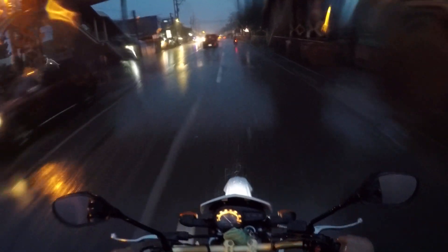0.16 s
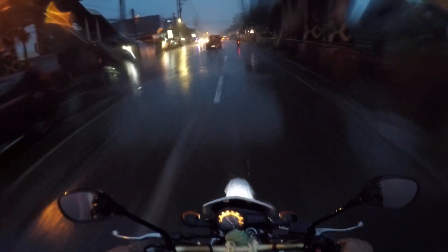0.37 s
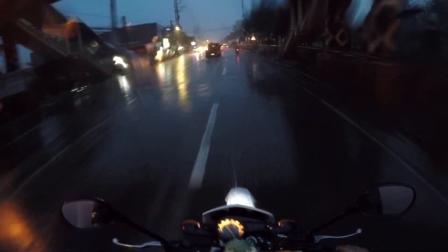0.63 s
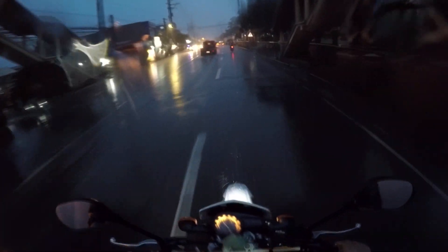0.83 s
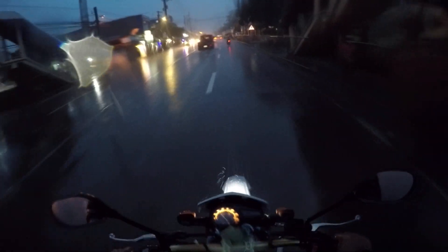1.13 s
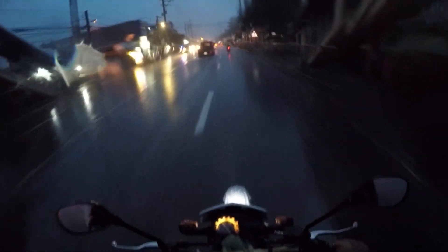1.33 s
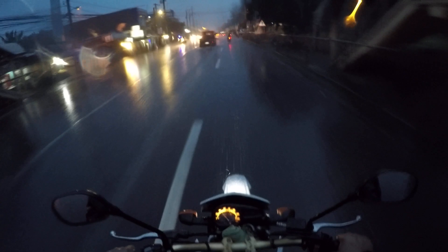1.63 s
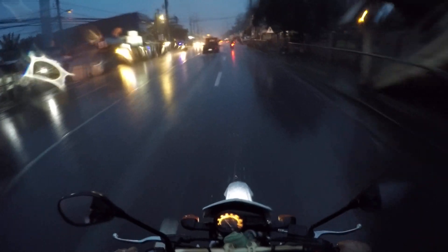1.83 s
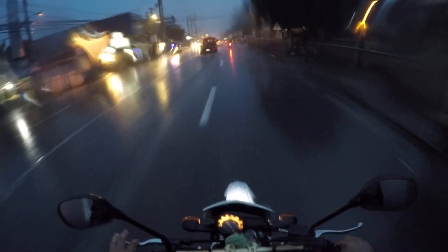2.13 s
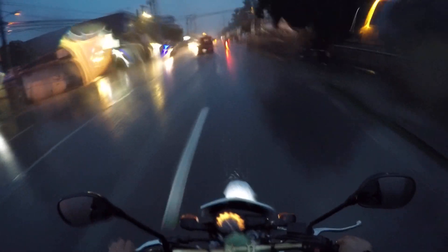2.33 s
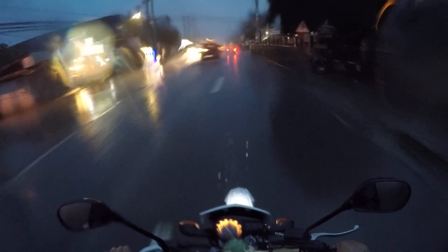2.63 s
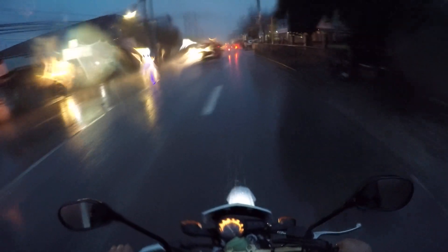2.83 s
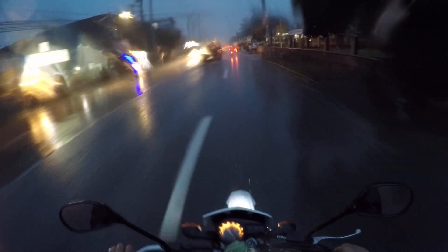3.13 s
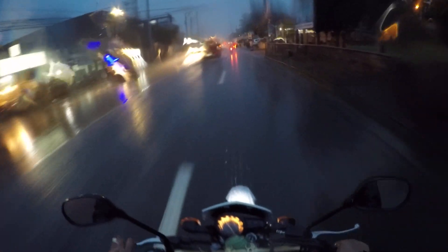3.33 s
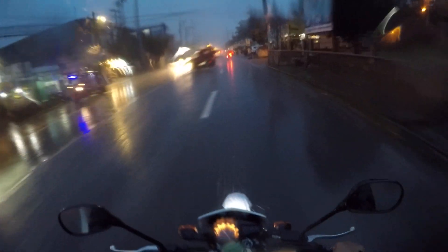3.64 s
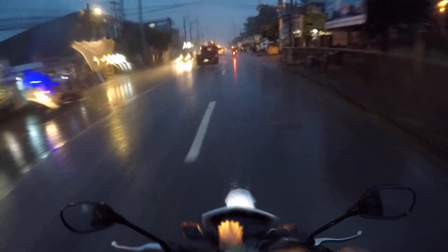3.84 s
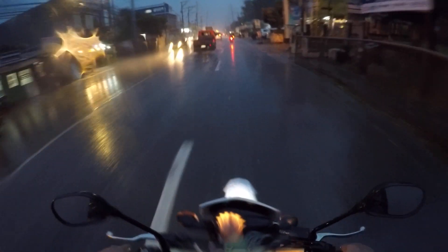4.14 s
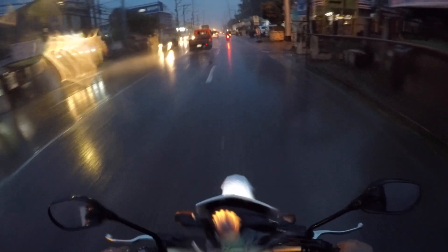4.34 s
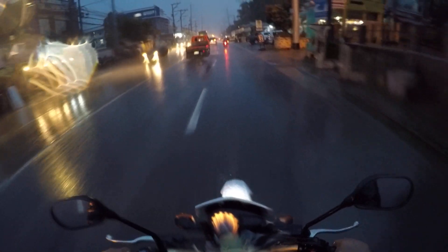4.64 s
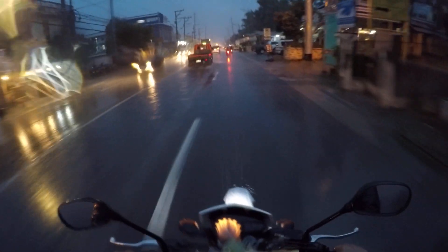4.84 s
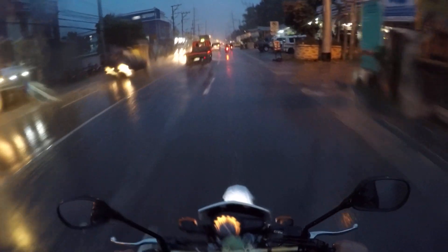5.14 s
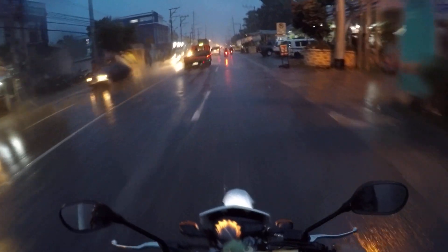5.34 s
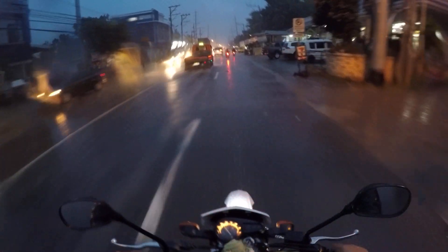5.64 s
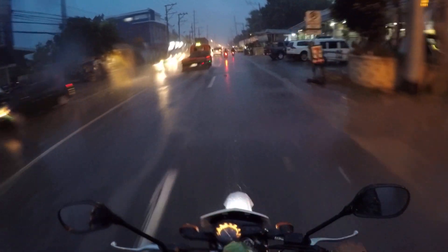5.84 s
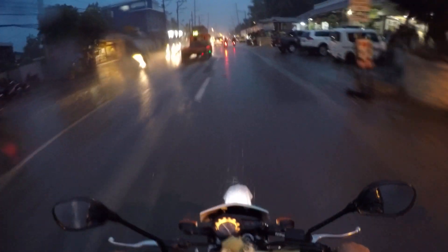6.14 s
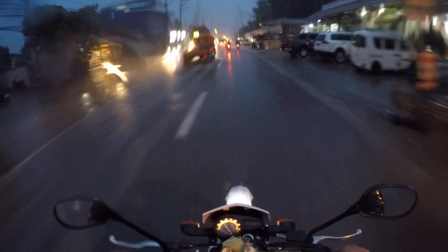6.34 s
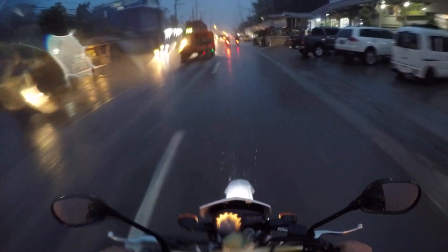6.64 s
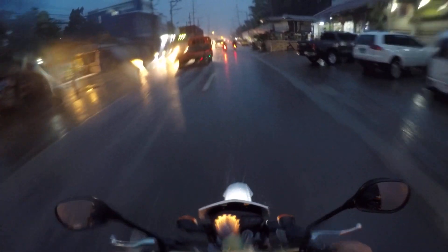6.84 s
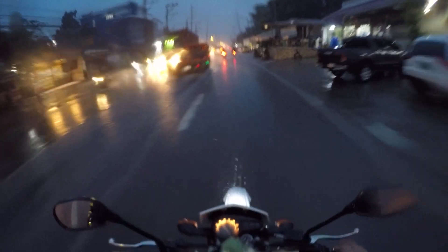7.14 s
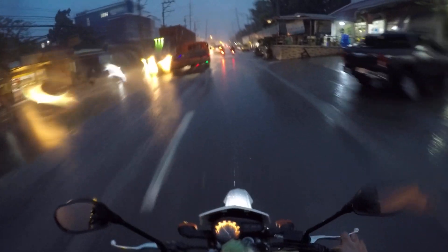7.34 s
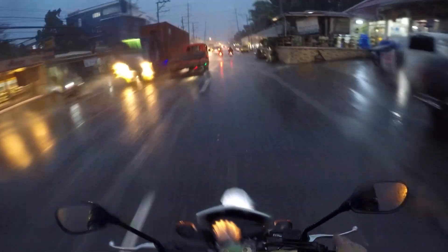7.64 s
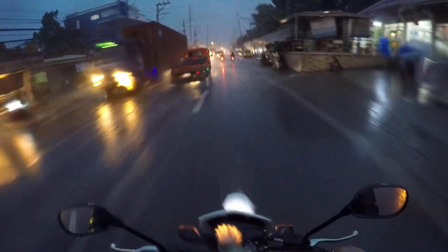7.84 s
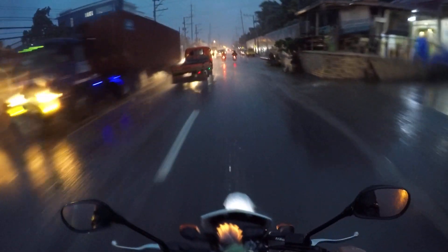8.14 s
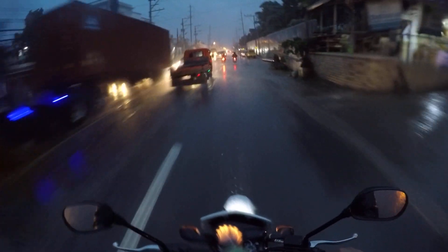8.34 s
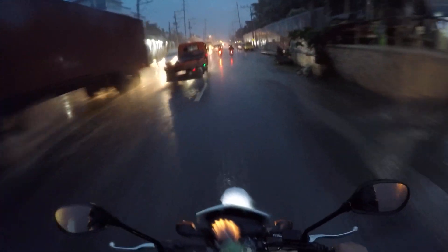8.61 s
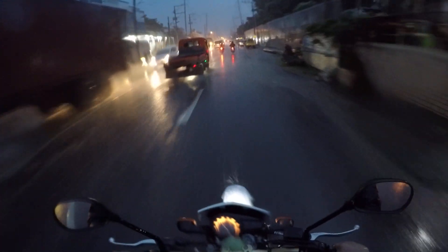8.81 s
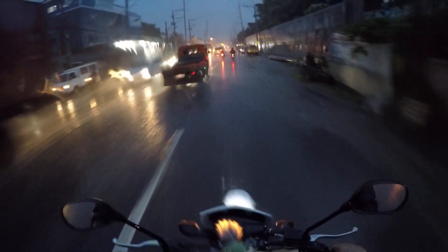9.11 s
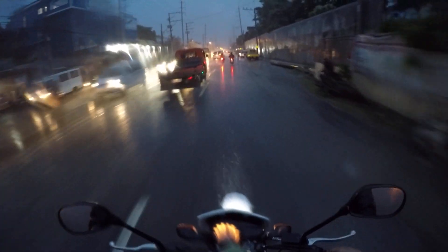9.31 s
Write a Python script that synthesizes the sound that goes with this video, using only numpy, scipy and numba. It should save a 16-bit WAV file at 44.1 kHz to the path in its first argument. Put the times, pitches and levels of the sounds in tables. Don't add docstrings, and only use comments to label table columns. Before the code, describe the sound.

Heavy raindrops crack and patter on a plastic camera housing above low wind and engine rumble and wet road hiss on a moving motorcycle.

```python
import sys
import numpy as np
from scipy import signal
from scipy.fft import rfft, irfft
from scipy.io import wavfile
from scipy.ndimage import map_coordinates
from numba import njit

SR = 44100
rng = np.random.default_rng(int(sys.argv[2]) if len(sys.argv) > 2 else 0)


def invert_db(level):
    return 10 ** (np.asarray(level, dtype=float) / 20)


def unload_audio(sound):
    columns = np.transpose(np.atleast_2d(sound))
    steps = np.round(np.clip(columns, -1, 1) * 32767)
    wavfile.write(sys.argv[1], SR, steps.astype(np.int16))


N = 417627


def level(x, db):
    return x * invert_db(db) / np.sqrt(np.mean(x ** 2))


def band(x, hz, width_hz):
    b, a = signal.iirpeak(hz, hz / width_hz, fs=SR)
    return signal.sosfilt([[*b, *a]] * 2, x)


def high_pass(x, order, hz):
    return signal.sosfilt(signal.butter(order, hz, "high", fs=SR, output="sos"), x)


def walk(rate_hz):
    points = rng.standard_normal(int(N / SR * 200) + 9)
    place = np.arange(0, N + 64, 64) * min(rate_hz, 199) / SR
    return map_coordinates(points, [place]).repeat(64)[:N]


@njit
def add(out, at, hz, t60_s, size, rise_s):
    for g in range(len(at)):
        turn = np.exp(2j * np.pi * hz[g] / SR - np.log(1000) / (t60_s[g] * SR))
        z = size[g] + 0j
        missing = 1.
        fill = np.exp(-1 / (rise_s[g] * SR))
        for i in range(at[g], min(at[g] + int(.8 * t60_s[g] * SR), len(out))):
            missing *= fill
            out[i] += z.imag * (1 - missing)
            z *= turn


# centre in Hz, width in Hz, density in dB.
RUMBLE = [(24.7, 15.4, 1), (66, 19, 0), (95, 21.4, -5.5), (123, 24, -16.5), (184, 18.6, -15.5),
          (257, 136, -22.5)]


def rumble():
    out, gust_db = 0, 2.3 * walk(11)
    for hz, width_hz, db in RUMBLE:
        noise = band(rng.standard_normal(N), hz, 1.58 * width_hz)
        swell = invert_db(1.43 * walk(6) + gust_db)
        out = out + level(noise, db + 10 * np.log10(width_hz)) * swell
    return level(out, 0)


# frequency in Hz, density in dB per Hz.
SPRAY = [(150, -4), (430, -8), (800, -8.5), (1100, -5.5), (1320, -6.5), (1550, -2), (2700, -7),
         (3450, -16.5), (4700, -12), (5300, -23.5), (7300, -27), (8500, -34.5), (13500, -38), (15200, -54)]


def spray():
    flat = 0
    for hz in 170 * 2 ** (np.arange(14) / 2):
        noise = band(rng.standard_normal(N), hz, hz / 2)
        flat = flat + level(noise, 10 * np.log10(hz)) * invert_db(1.2 * walk(13))
    hz_points, db_points = np.transpose(SPRAY)
    hz = np.arange(1, N // 2 + 2) * SR / N
    colour = invert_db(np.interp(np.log(hz), np.log(hz_points), db_points, left=-60, right=-90))
    return level(irfft(rfft(flat) * colour, N), 0)


# start in seconds, end in seconds, start in Hz, end in Hz, level in dB.
WHISTLES = [
    (4.05, 4.7, 12250, 12200, -83),
    (4.35, 5.27, 13750, 13650, -73),
    (5.53, 5.7, 15150, 15000, -82),
    (5.7, 6.2, 13600, 13300, -71),
    (5.88, 6.18, 12050, 11750, -77),
    (6.82, 7.0, 11300, 11500, -74),
    (7.08, 7.27, 11300, 11300, -68),
    (7.72, 7.95, 11250, 11500, -73),
    (8.0, 8.7, 12800, 12950, -76),
    (8.42, 8.95, 11200, 11450, -73),
]


def whistles():
    t, out = np.arange(N) / SR, 0
    for start_s, end_s, start_hz, end_hz, db in WHISTLES:
        hz = np.interp(t, [start_s, end_s], [start_hz, end_hz]) + 95 * walk(190)
        fade = np.clip(np.minimum(t - start_s, end_s - t) / 0.06, 0, 1)
        breath = invert_db(db + 6.5 + 3.5 * walk(14) + 6.5 * walk(180))
        out = out + fade * breath * np.sin(2 * np.pi * np.cumsum(hz) / SR)
    return out


# start in
# seconds, thud in dB, thud in Hz, t60 in seconds.
THUDS = [(1.14, -21, 330, .03), (1.147, -15, 73, .14), (1.483, -24, 19.5, .9), (1.515, -21, 180, .2),
         (1.516, -25, 370, .07), (1.5352, -19, 92, .09), (1.808, -14, 290, .03), (3.744, -16, 60, .09),
         (3.746, -22.5, 182, .05), (4.502, -20, 230, .022), (5.894, -24, 110, .06)]


def thuds():
    s, db, hz, t60_s = np.array(THUDS).T.copy()
    out = np.zeros(N)
    add(out, (s * SR).astype(np.int64), hz, t60_s, invert_db(db), 0.089 / hz)
    return out


# frequency in Hz, level in dB, t60 in seconds,
# part (rounded: 0 door, 1 frame, 2 shell, 3 lens, 4 splash).
HOUSING = [(683, -4, 0.016, 0), (836, 1, 0.019, 0), (954, -7.5, 0.023, 0), (1188, -4.5, 0.015, 1),
           (1358, 4, 0.016, 1), (1730, -7, 0.017, 2), (2117, 2.5, 0.01, 2), (2485, -7, 0.018, 2),
           (2827, -0.5, 0.01, 2.5), (3497, -6, 0.0089, 3), (3895, 1, 0.0081, 3), (4265, -4, 0.008, 3),
           (4650, -2.5, 0.0069, 3), (5500, -18.5, 0.0094, 1.5), (6050, -8.5, 0.0066, 4),
           (7170, -1, 0.0037, 4), (9400, -6.5, 0.0028, 4), (10400, -7, 0.0018, 4), (12560, -11, 0.0014, 4),
           (13600, -16, 0.0031, 4), (15600, -17, 0.0036, 4)]


def housing(s, part_db, scatter_db, detune, spread_s, tail_db, ring):
    hz, db, t60_s, part = np.transpose(HOUSING)
    part = np.round(part).astype(int)
    tune, strength, sign, late = np.moveaxis(rng.standard_normal((len(s), 4, 2, len(hz))), 1, 0)
    t60_s = t60_s * np.array([[ring], [2.4]]) * np.ones_like(tune)
    size = np.sign(sign) * invert_db(db + scatter_db * strength + np.array([[0], [tail_db]]))
    first_s = .005
    tau_s = t60_s / np.log(1000)
    power = np.sum(size ** 2 * tau_s / 4 * (1 - np.exp(-2 * first_s / tau_s)) / first_s, axis=1)
    part_power = power @ (part[:, None] == np.arange(part.max() + 1))
    size *= (invert_db(part_db) / np.sqrt(part_power))[:, None, part]
    spread_s = spread_s[:, None, None]
    at = (s[:, None, None] + spread_s * np.abs(late)) * SR
    mode_hz = np.minimum(hz * (1 + detune * tune), .45 * SR)
    rise_s = 0.33 * spread_s * np.ones_like(tune) * np.minimum(2500 / hz, 1)
    out = np.zeros(N)
    add(out, at.astype(np.int64).ravel(), mode_hz.ravel(), t60_s.ravel(), size.ravel(), rise_s.ravel())
    return out


def softness(part_db):
    return .00015 + .00006 * np.clip(part_db[:, 2] - part_db[:, 4] - 16, 0, 25)


def colours(body_db, treble_db, lean):
    low_db = body_db[:, None] + np.array([-12., -6., -2.]) + lean[:, None] * np.array([4., 3.5, -1.5])
    splash_db = treble_db - 11.5 + .2 * (treble_db - body_db + 10.5)
    return np.column_stack([low_db, treble_db, splash_db])


def patter(count=2200):
    s, size = rng.random(count) * N / SR, rng.exponential(size=count)
    bright, lean = rng.standard_normal((2, count))
    size_db = 8.2 * np.minimum(size, 1.9)
    treble_db = size_db - 19.5 + 5.0 * np.minimum(bright, 1.3)
    part_db = colours(size_db - 2.5 * bright, treble_db, lean)
    drops = housing(s, part_db, 8.1, 0.073, 1.5 * softness(part_db), tail_db=-11.5, ring=0.94)
    return level(drops, 0)


# start in seconds, length in seconds, level in dB.
GOUTS = [
    (0.484, 0.0011, -32),
    (1.5138, .02, -31),
    (1.516, .008, -40),
    (1.545, 0.011, -46),
    (2.827, 0.014, -28.5),
    (6.742, 0.013, -32.5),
    (7.276, 0.015, -33),
    (8.623, 0.013, -36),
    (6.201, 0.018, -36),
]


def gouts(count=8):
    s, length_s, db = np.transpose(GOUTS)
    place = np.arange(count) / (count - 1)
    at_s = s[:, None] + length_s[:, None] * (place + 0.071 * rng.standard_normal((len(s), count)))
    body_db = (db[:, None] + 4.5 - 7 * place ** 1.5).ravel()
    part_db = colours(body_db, body_db - 23.5, np.zeros_like(body_db) + 0.48)
    return housing(at_s.ravel(), part_db, 2.9, 0.047, softness(part_db), tail_db=-9.5, ring=0.58)


TILT_SHARES = [0.77, 0.9, 0.41, 0.75, 1.0]


def struck(rows, ring_db, order, deep=True):
    rows = np.array(rows)
    place = np.arange(len(ring_db)) - order
    tilt_db = rows[:, [2]] * (place > 0) + deep * rows[:, [-1]] * (place < 0)
    return rows[:, 0], rows[:, [1]] + ring_db + tilt_db * TILT_SHARES


# level in dB of door, frame, shell, lens, splash.
ON_SHELL_DB = [-16.5, -11, 0, -10.5, -19]
ON_LENS_DB = [-14, -13, -3, 0.5, -10.5]
ON_FRAME_DB = [-12.5, 3, -2.5, -18.5, -26.5]
ON_DOOR_DB = [1.5, -20, -3, -7.5, -14.5]
ON_SPLASH_DB = [-14, -11, -7, -3, -0.5]
# start in seconds, level in dB over the first 5 ms, brightness in dB, depth in dB.
SHELL_HITS = [(0.2764, -15.5, -8.5, 13.5), (0.4595, -16.5, 3.5, 4), (0.6732, -12, 1.5, 6),
              (0.6962, -7, 7.5, -4), (1.1387, -7.5, -10.5, 9), (1.1425, -15, -12.5, 14),
              (1.1885, -13, -3.5, -1), (1.6588, -18, -5.5, 11), (1.7967, -12.5, 5, -8),
              (1.8076, -7.5, 7.5, 1.5), (1.8716, -12.5, 12, -20), (2.3611, -14, 10, -12),
              (2.8775, -18, -11, 7), (2.9953, -10, 6.5, -13), (3.0998, -17, -16, -3),
              (3.8072, -16.5, -1, -4), (3.8368, -8, 5.5, -17), (4.051, -10.5, 3, -16),
              (4.1964, -11.5, 2.5, 0), (5.3464, -18.5, 1, 11), (5.4037, -18, 3, 7), (5.4793, -9, 9.5, -12),
              (6.1736, -17.5, -4.5, 1), (7.4103, -18.5, 6, 2), (7.5222, -16, 7, 5.5), (7.7293, -11, 10, -5),
              (8.212, -19, 9.5, -13), (8.3298, -18, -6.5, -1), (8.5767, -20.5, 11, 9), (8.6681, -9, 12, -8),
              (9.119, -16, -1.5, -9)]
SHELL_TAPS = [(0.2012, -20, 0, 2), (0.3194, -24, -2, 9), (1.063, -33, -4.5, 4), (1.117, -27, -6, 6),
              (1.0856, -24.5, -5, 14), (1.954, -21, -1, 12.5), (2.3225, -25.5, -10, 4),
              (2.4689, -22, -4, 3), (2.5019, -24, 6.5, -10), (2.7016, -22, -1.5, 1),
              (2.7864, -22.5, -11, 9), (3.083, -22, -3.5, 12.5), (3.797, -23, -6.5, 6),
              (3.8596, -20, -11, -4), (4.486, -24.5, -8, 7), (5.2574, -22, -3.5, 0), (5.4146, -20, -0.5, 7),
              (5.5249, -17, 2.5, -3), (5.678, -22, -6, 9.5), (5.777, -23.5, 12.5, 14),
              (5.8966, -22.5, 7, 6), (6.123, -22.5, 6.5, 6), (7.284, -21, -11, -1), (7.406, -20, -0.5, -2),
              (7.9954, -22, -10.5, 11), (8.362, -20.5, -3, 10.5), (8.522, -22.5, -4, 8),
              (8.6843, -22.5, 0, 13), (8.809, -24.5, 7, 11.5), (9.3297, -20, -7.5, 7),
              (9.3544, -25, 5, -13), (9.3574, -20, -2, -10)]
SHELL_PATS = [(0.1186, -29, -6, 18), (0.1447, -26.5, -1, 2), (1.0085, -30, -3.5, 8),
              (3.4736, -25.5, -2.5, 2), (3.4494, -27, -0.5, 8), (3.5036, -25.5, 2.5, 1),
              (3.5646, -25, -5, 9), (3.669, -23.5, -6, 4), (0.223, -30.5, -3, 13), (3.0625, -29.5, 5, 15),
              (5.497, -30, 8, 3), (4.7335, -29, 9.5, -6), (5.0793, -26, 1.5, -6), (5.3825, -25, 0, 13),
              (5.1734, -26, -2, 15), (5.2179, -26.5, -0.5, 8), (5.9132, -23, -6, 5), (6.0805, -23, -1, 2),
              (6.3545, -25, 0, 3), (6.302, -22, -4, 5), (6.3176, -21.5, -5, 3), (6.6407, -30.5, 5, -5),
              (6.8749, -24, -0.5, -9), (6.9704, -22.5, -2, -4), (7.4602, -25, -3.5, 9.5),
              (7.6399, -28, 0, 14), (7.7568, -27, 3, 8), (7.9801, -26.5, 9, 12), (8.1167, -29, -6.5, 11),
              (8.1876, -24.5, -9.5, -7), (8.2348, -24, -12.5, -2), (8.3, -25, -9, 7), (8.8405, -28, -5, 2),
              (8.8566, -25, -4.5, 1), (8.766, -24, -2.5, 9), (9.4273, -24, -0.5, 9)]
LENS_HITS = [(0.3089, -11.5, 2, 4), (0.487, -12, 7, 4.5), (1.7755, -23, -20, -3), (2.1699, -27, 0, 13.5),
             (2.9318, -9.5, 1, -10), (2.9431, -18, 5, 7), (3.5449, -18.5, -3, -4), (3.6408, -25.5, 4.5, -1),
             (3.7066, -21.5, 1, 13.5), (3.831, -30, 0, -3), (3.9412, -17.5, 14.5, -8), (4.502, -8, 5, -1.5),
             (4.9715, -16, 5.5, -8), (5.3345, -26, 0, 8), (5.3693, -13, -12.5, -6), (5.4267, -8.5, -3, -20),
             (5.845, -14.5, -7, -4.5), (5.9464, -18.5, -9.5, -3), (6.069, -17.5, -0.5, -10),
             (6.1821, -19, 2, 1.5), (6.2967, -13, -3, -13), (6.3702, -11.5, 7, -1), (6.4543, -14, 1.5, -2),
             (6.5634, -14.5, -11, -7.5), (7.0634, -23.5, 3.5, 2), (7.3785, -14.5, -9.5, 4.5),
             (7.9023, -15.5, 6.5, 4), (8.7767, -12, -1.5, -5), (8.9839, -27, -1, 10), (9.135, -16, 0, -7)]
LENS_TICKS = [(0.163, -27.5, 1, -6), (0.184, -39, -10, -5), (0.732, -28, 7, -15), (0.8862, -31, -6.5, 5),
              (1.173, -30, -5, 7), (1.1999, -27, 1, 7), (1.2298, -28.5, -10, -3.5), (1.376, -41, -2, -13),
              (4.658, -36.5, 4, 11), (1.723, -29.5, 2, 7), (1.749, -28.5, 5, -4), (1.98, -31.5, -2, 3),
              (2.3429, -32, 3, 3), (2.7796, -31, 3, -8), (3.016, -32, 5, 1), (3.4605, -30, 2, 10),
              (4.1304, -38, 5, 11), (4.2185, -34.5, -4, 0), (4.335, -34.5, 3, 4), (5.0556, -31, 9, -11),
              (5.1451, -33.5, 7, -8), (5.463, -31, 14, 0), (5.564, -30, -4, -3), (5.835, -29.5, -5, 4),
              (7.3406, -27.5, -6, 10), (8.663, -36, -3, 5)]
LENS_PATS = [(0.2567, -37, 5, 15), (0.3929, -37, -1, 11), (0.4949, -37, -8, 11), (1.2232, -33.5, -2, 11),
             (2.2641, -35.5, -4, 14), (2.2857, -33, 4, 15), (9.4615, -28, -2, 1), (2.6015, -35.5, 2.5, 0),
             (2.7531, -29, -6.5, 8.5), (3.1487, -32.5, -9, 14), (3.1876, -33.5, -4, 8),
             (3.3063, -34, -3, 6), (3.3925, -36, -8, 9), (3.5507, -38, 0, 19), (3.6966, -33, -1, 10),
             (3.8111, -21, 4, 8), (3.8872, -28, -1, 8), (5.308, -37, 4, 0), (5.7124, -35, -3, 1),
             (6.3941, -35, 1, 19), (7.0078, -30.5, -3, 7), (7.1726, -15, -3, -13), (8.6328, -34, 0, 13),
             (7.6473, -37, 3, 3), (7.7755, -37, 4, 8), (7.8728, -35, 6, 5), (7.9902, -33.5, 6, 7),
             (8.2498, -27.5, 2, 0), (8.5957, -30.5, 3, 19), (8.6161, -31, 5, 15), (8.6876, -25, 2, 2),
             (8.989, -32, -5.5, 7), (9.3805, -32, 0, 22), (9.42, -28, -2, 10)]
FRAME_HITS = [(0.2337, -28, 9, -9), (0.2645, -27, 13, 3), (0.3272, -19.5, -18, -4),
              (0.6174, -19.5, -20.5, 2), (0.6334, -19.5, -9, 8), (0.8442, -27.5, 2.5, -1),
              (0.9979, -28, 6, 9), (1.7614, -29, 4, 1), (2.8228, -23.5, 8.5, 6), (3.1178, -24, -7.5, 5),
              (3.3768, -23.5, -8.5, 11), (3.6463, -26, 1, -3), (4.3882, -22.5, 5.5, -27),
              (5.1181, -26.5, 7.5, -9), (6.0216, -22, 2.5, 5), (6.2129, -27.5, 10, 18),
              (6.3821, -26, -11, -9), (6.776, -27, -6, -12), (8.1011, -26, 2.5, -4), (8.4211, -21, -11, -1),
              (8.4894, -30, 3, -2), (9.058, -24, -5, 0), (9.1594, -25.5, 2.5, -2), (9.1988, -18, -1, 7)]
# start in seconds, level in dB, brightness in dB.
FRAME_PATS = [(0.273, -27, 3.5), (0.418, -25, -3.5), (0.6005, -40, -1), (0.9833, -32, 6), (0.1302, -28, -1),
              (1.6556, -22, 6.5), (1.7278, -34.5, 11), (1.9264, -34.5, 8), (4.9213, -29.5, 0),
              (3.1145, -33, -1), (3.2371, -28.5, 0), (3.3313, -28.5, 12), (8.7516, -30, 0),
              (3.6048, -27, -10), (3.8557, -28, 10), (3.9797, -27, 6.5), (4.2115, -34, 13),
              (4.3548, -32.5, 8), (4.3937, -27, -4.5), (4.5969, -26, -7.5), (5.7479, -28, 5),
              (6.4417, -32, 8), (6.8947, -31, 13.5), (7.2756, -28.5, -12), (7.6247, -31.5, 5.5),
              (8.1044, -27.5, 6), (8.6412, -20.5, -2), (9.2973, -29.5, -7), (6.2857, -31, -4),
              (7.0779, -36, 1), (7.7883, -35, 6), (8.371, -34, 1)]
# start in seconds, level in dB, brightness in dB.
DOOR_HITS = [
    (0.293, -28, 0),
    (1.1621, -32, 12),
    (1.5139, -23.5, -15.5),
    (3.9552, -12.5, 3),
    (4.7827, -33, 3),
    (7.1726, -18, 12.5),
    (7.3671, -8.5, 2.5),
    (7.7092, -28, -8),
    (8.4106, -21.5, -10.5),
]
# start in seconds, level in dB, depth in dB.
SPLASHES = [(0.7379, -47, 2), (6.957, -39, -2), (0.9162, -52, 2), (1.1561, -42, 4), (1.243, -50, 6),
            (1.2688, -50, -4), (1.3076, -48, -1), (1.8169, -46, 0), (2.1761, -38, 3), (2.4068, -45, 5),
            (6.928, -39, -3), (2.6424, -46, 2), (3.2251, -52, 0), (3.7315, -43, 0), (3.8494, -32, 7),
            (4.0016, -46, -3), (4.8423, -50, 4), (5.169, -50, -12), (5.8178, -47, 2), (6.2022, -31, 5),
            (6.2182, -27.5, 8), (6.2552, -42, 5), (6.5164, -45, 3), (7.037, -35, -2), (7.4502, -47, -7),
            (7.6117, -46, -8), (7.6626, -42, -7), (8.7354, -42, -5), (9.4098, -49, 4)]


def big_drops():
    kinds = [struck(SHELL_HITS + SHELL_TAPS, ON_SHELL_DB, order=2),
             struck(LENS_HITS + LENS_TICKS, ON_LENS_DB, order=3),
             struck(FRAME_HITS, ON_FRAME_DB, order=1),
             struck(DOOR_HITS, ON_DOOR_DB, order=0),
             struck(SHELL_PATS, ON_SHELL_DB, order=2),
             struck(LENS_PATS, ON_LENS_DB, order=3),
             struck(FRAME_PATS, ON_FRAME_DB, order=1, deep=False),
             struck(SPLASHES, ON_SPLASH_DB, order=4)]
    s, part_db = (np.concatenate(k) for k in zip(*kinds))
    overload_db = 1.5 + .75 * np.clip(part_db.max(axis=1) + 15.5, 0, 9)
    overload_shares = np.array([0.36, 0.092, 0.75, 0.61, 0.32])
    trim_db = np.array([1.07, 2.05, 0.18, 0.82, 0.27])
    blow_db = part_db + overload_db[:, None] * overload_shares - trim_db
    spread_s = softness(part_db) + .00003 * overload_db
    return housing(s - .0001, blow_db, 1.67, 0.021, spread_s, tail_db=-16.5, ring=0.86)


# time in seconds, rain strength in dB, wind strength in dB.
RIDE = [(0.0, -36.5, -38.5), (0.34, -33.5, -40.5), (1.47, -42, -50), (1.79, -40.5, -45.5),
        (2.53, -39, -43.5), (2.92, -31, -40.5), (3.24, -37, -47.5), (3.69, -32, -38.5), (4.25, -41, -46.5),
        (4.83, -40.5, -47), (5.35, -33, -38.5), (5.64, -40, -43), (6.83, -35, -37.5), (6.99, -34, -35.5),
        (7.75, -36.5, -40.5), (8.55, -31.5, -38), (8.91, -35.5, -39.5), (9.47, -32.5, -36.5)]


def scene():
    t = np.arange(N) / SR
    s, *columns = np.transpose(RIDE)
    rain_db, wind_db = (np.interp(t, s, c) for c in columns)
    spray_db = -12.5 + 0.51 * rain_db + 0.32 * wind_db
    hiss = spray()
    traffic = invert_db(np.interp(t, [6.45, 7.06], [-9, 5])) * high_pass(hiss, 1, 4000)
    film_db = -10 * ((t > 1.24) & (t < 1.51))
    drops = big_drops() + gouts() + invert_db(rain_db - 0.5 + film_db) * patter()
    drops = high_pass(drops, 3, 440)
    air = invert_db(spray_db) * (hiss + traffic) + invert_db(wind_db + 5.5) * rumble()
    return (drops + air + thuds() + whistles())[None]


def low_pass(x):
    return signal.sosfilt(signal.butter(12, 16440, fs=SR, output="sos"), x)


def record(dry):
    squeezed = dry / (1 + np.abs(dry / 0.94) ** 5.64) ** (1 / 5.16)
    cut = signal.sosfilt(signal.ellip(4, .4, 27, 15000, fs=SR, output="sos"), squeezed)
    return low_pass(cut)


dry = scene()
out = record(dry)
unload_audio(out)
```